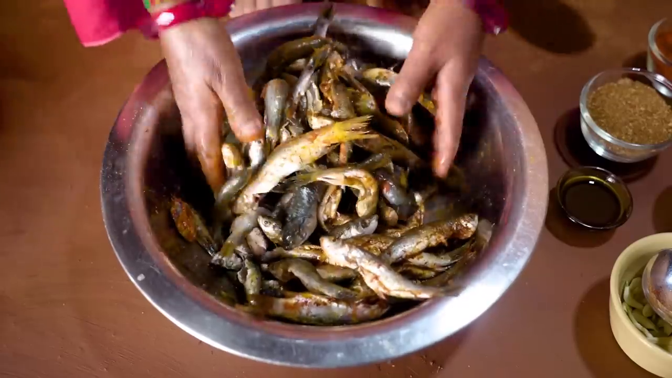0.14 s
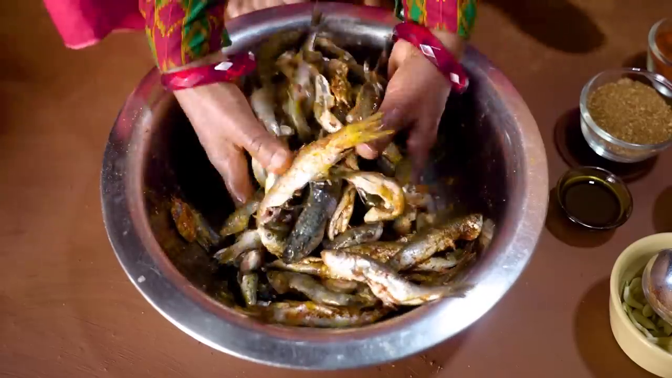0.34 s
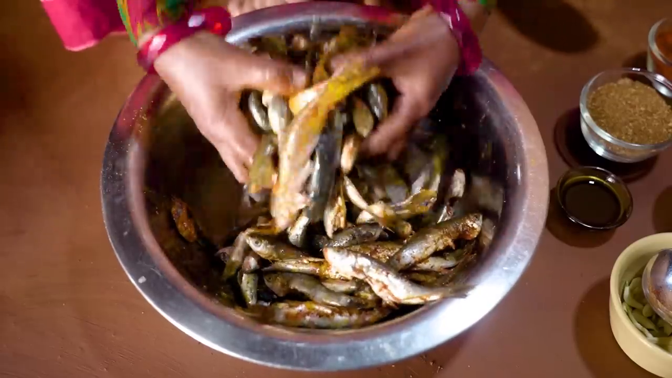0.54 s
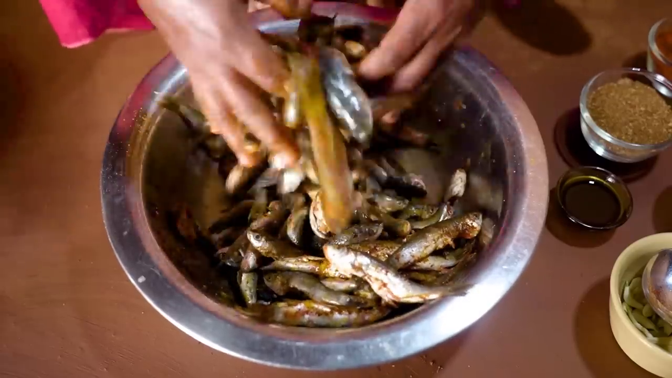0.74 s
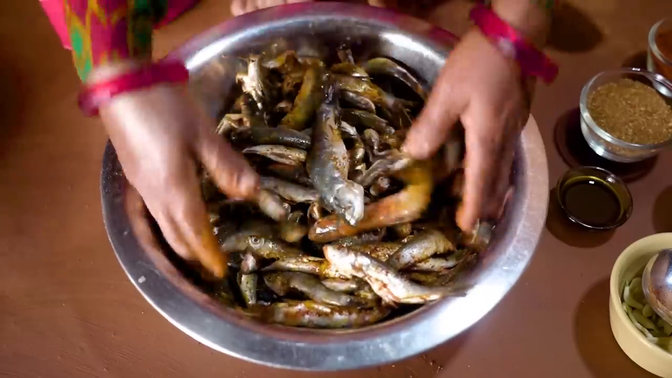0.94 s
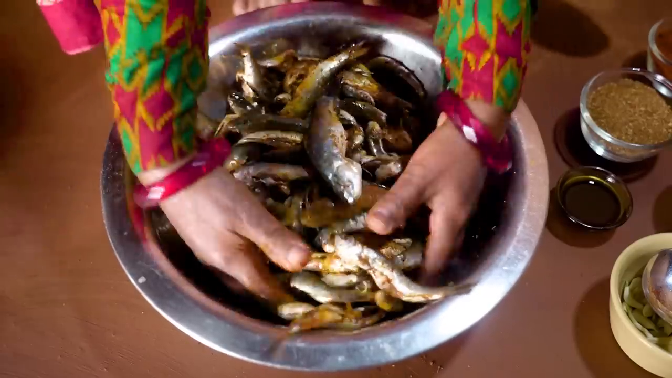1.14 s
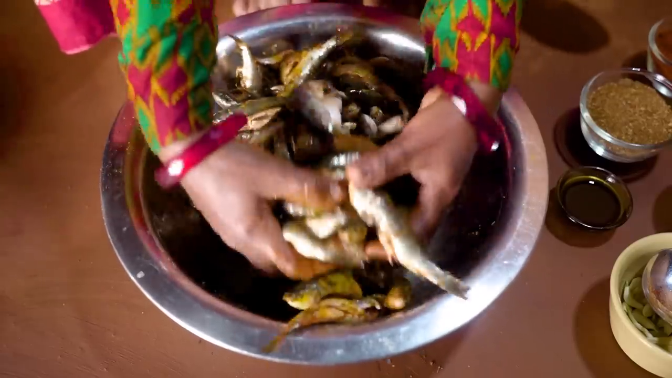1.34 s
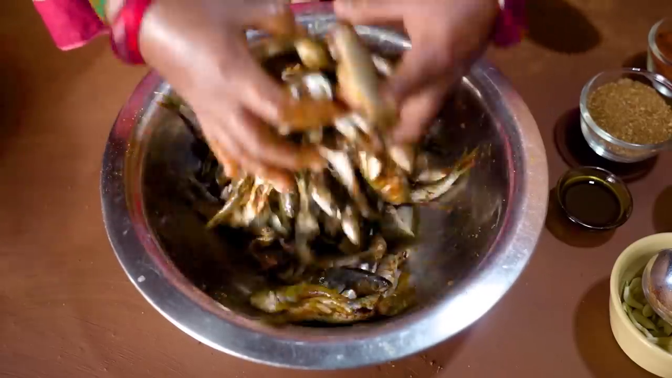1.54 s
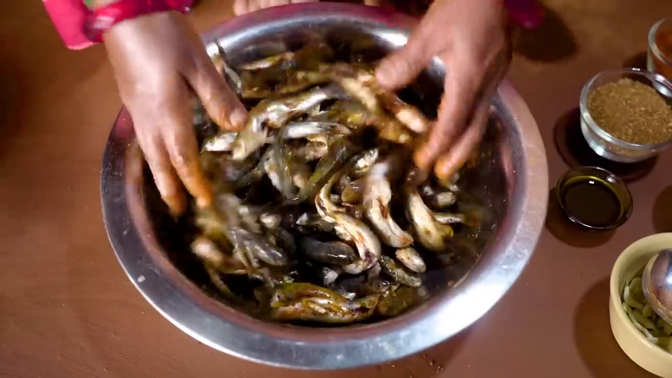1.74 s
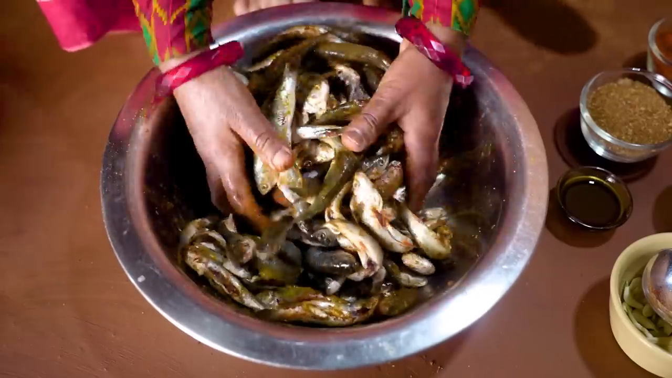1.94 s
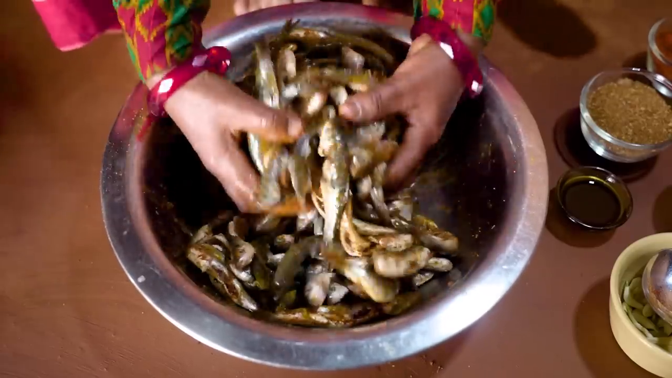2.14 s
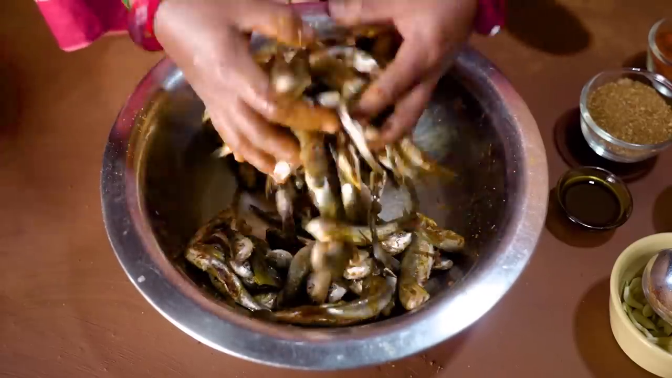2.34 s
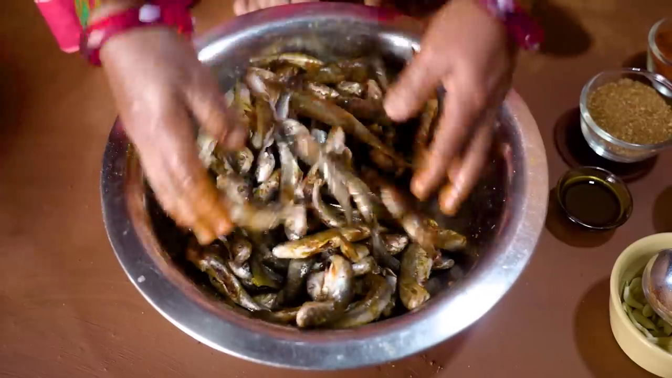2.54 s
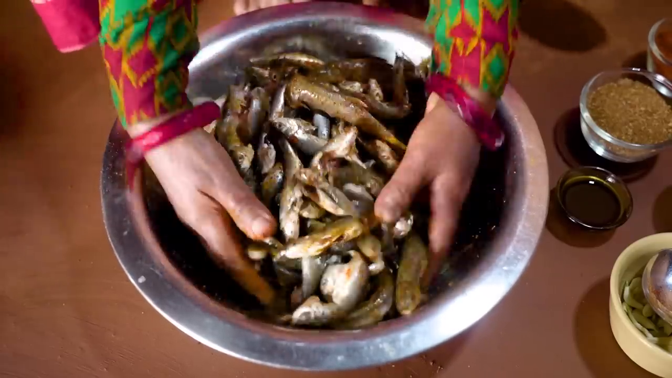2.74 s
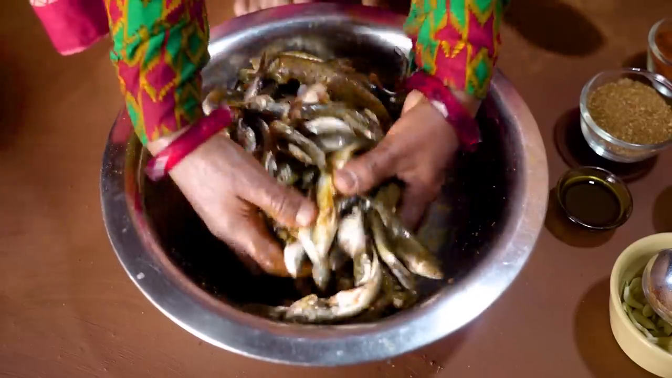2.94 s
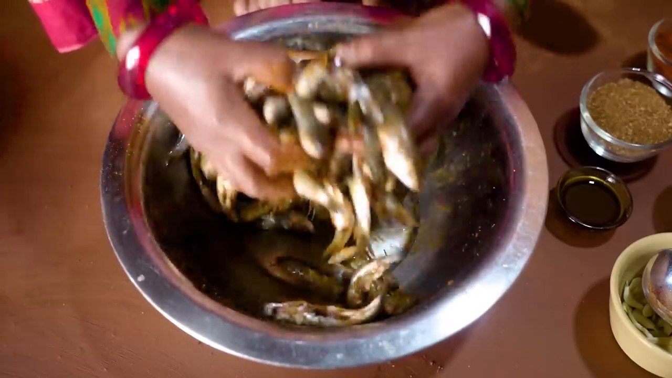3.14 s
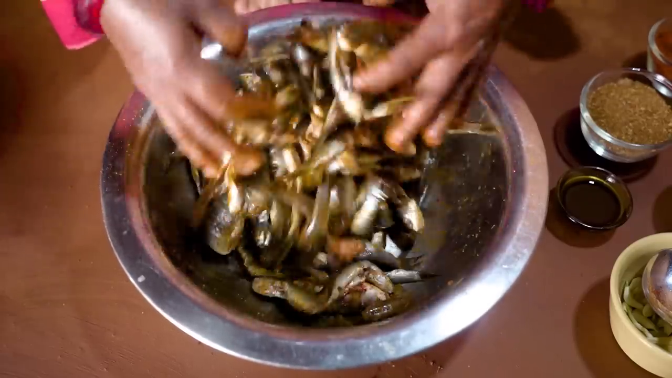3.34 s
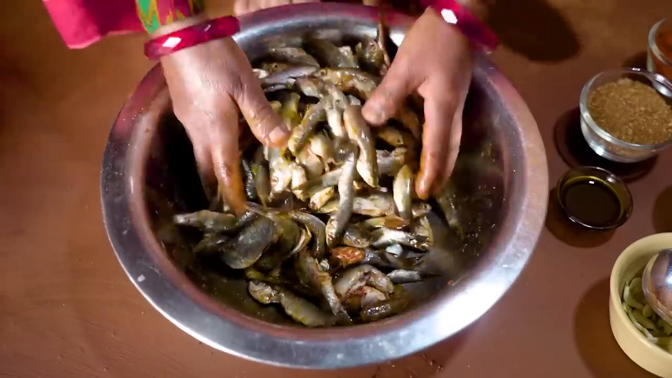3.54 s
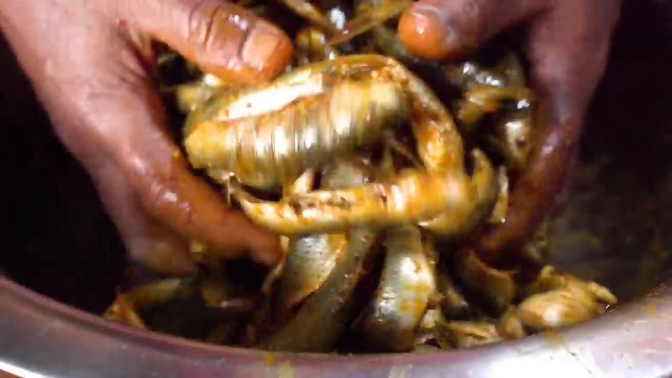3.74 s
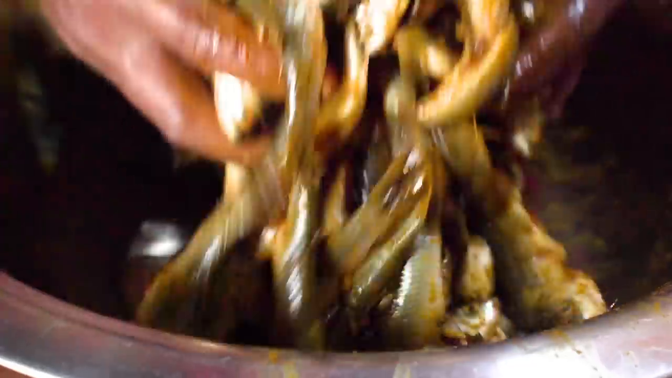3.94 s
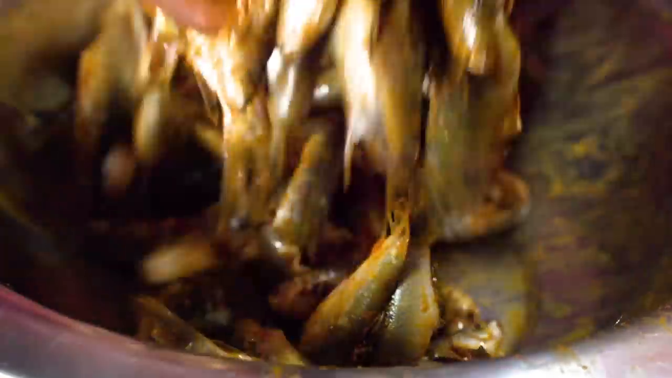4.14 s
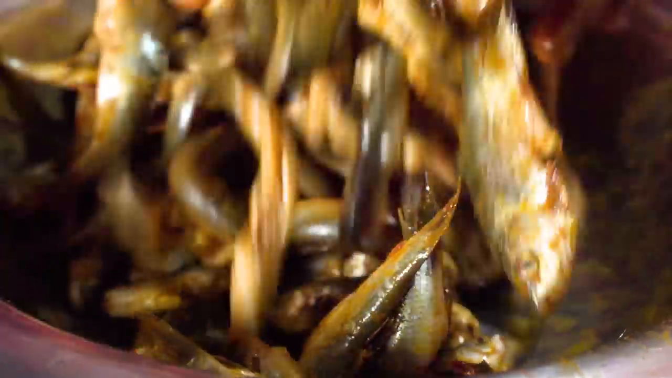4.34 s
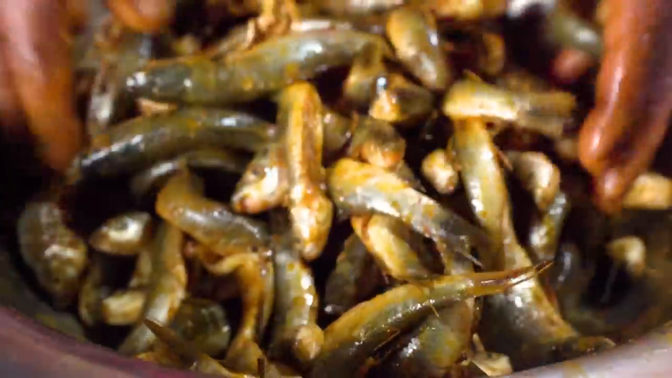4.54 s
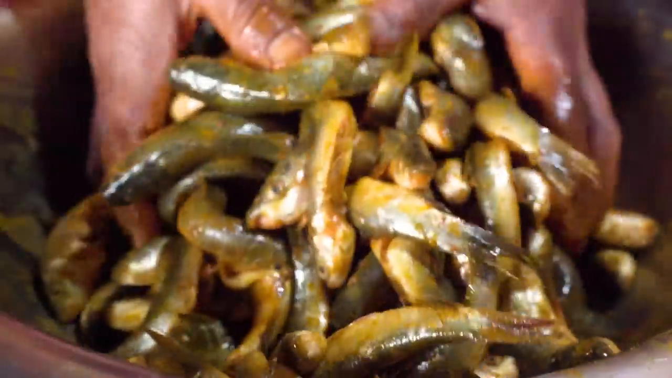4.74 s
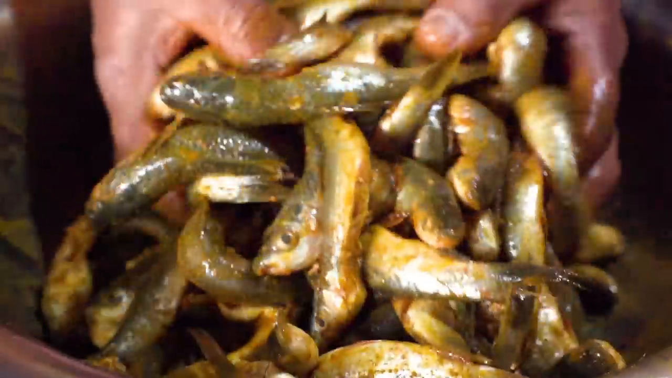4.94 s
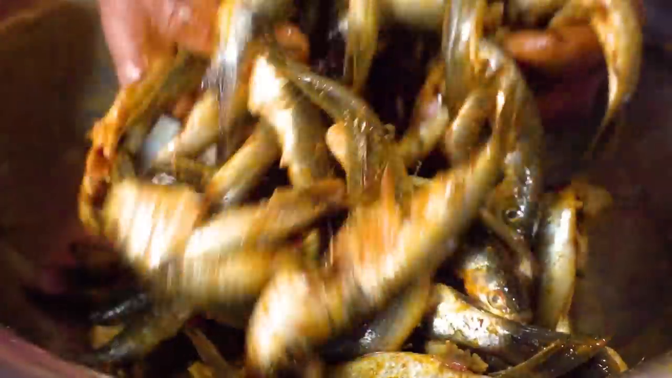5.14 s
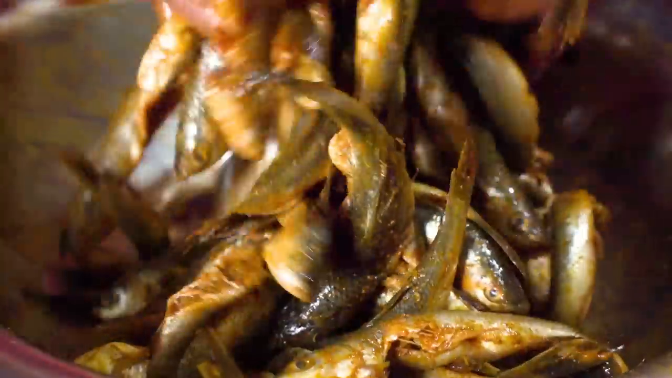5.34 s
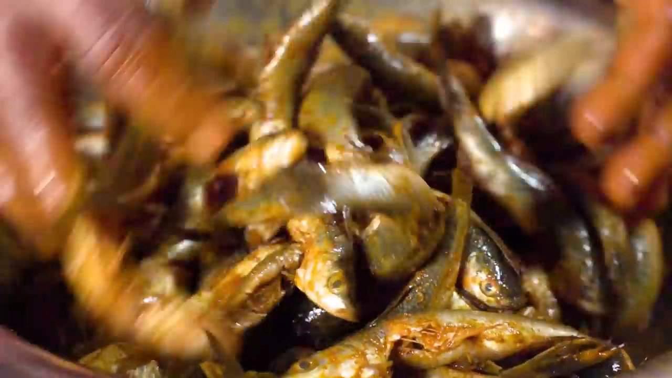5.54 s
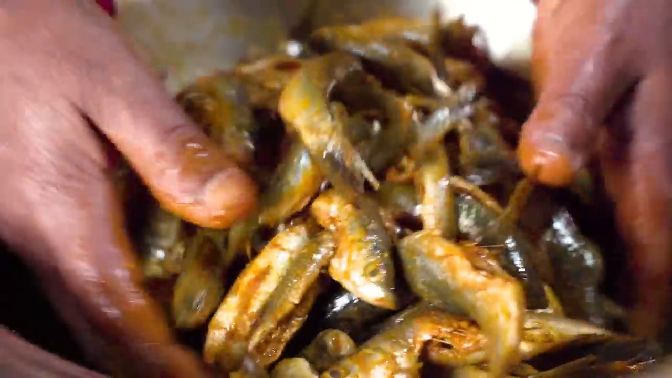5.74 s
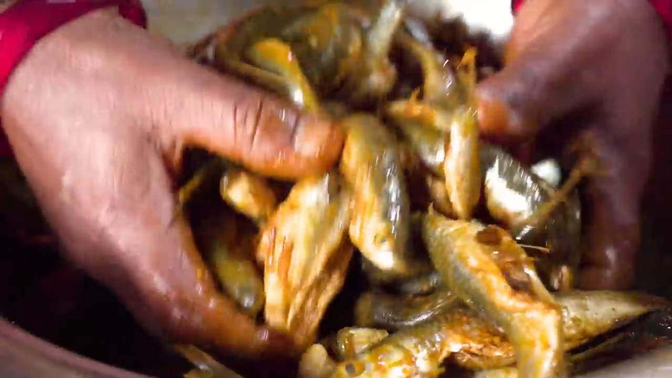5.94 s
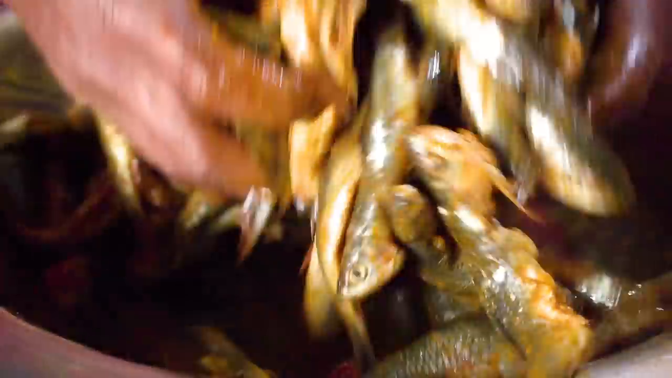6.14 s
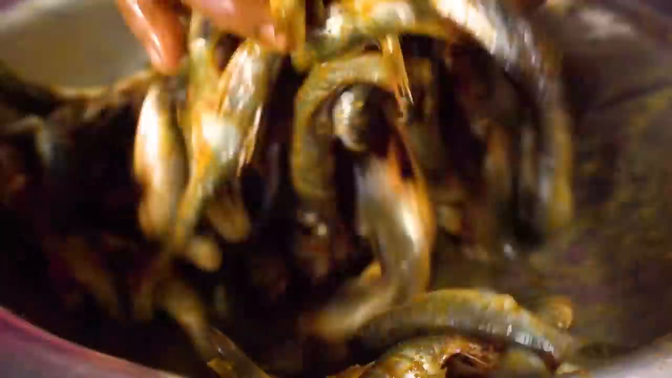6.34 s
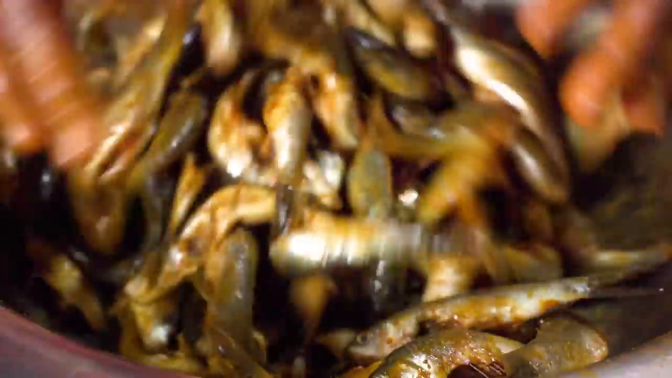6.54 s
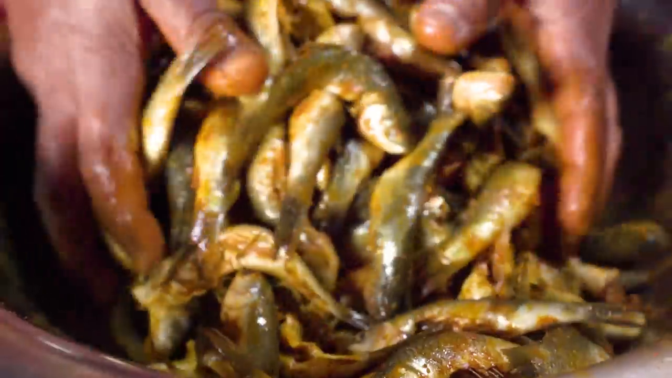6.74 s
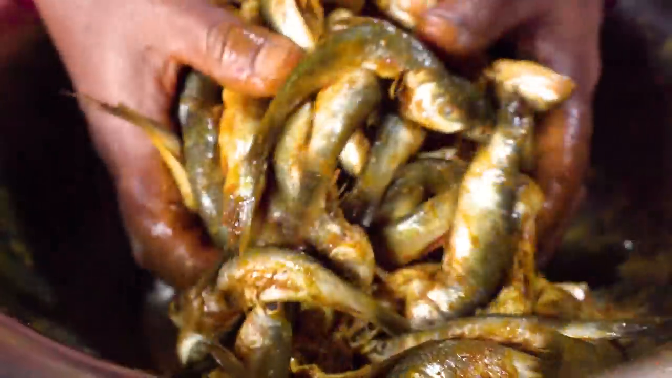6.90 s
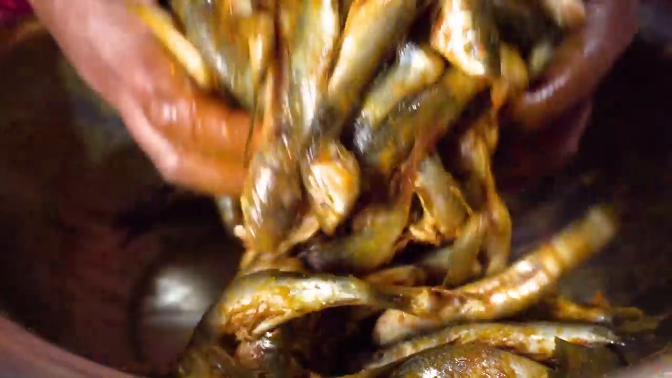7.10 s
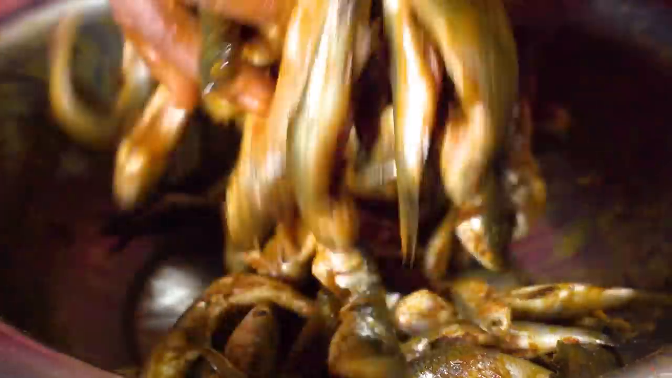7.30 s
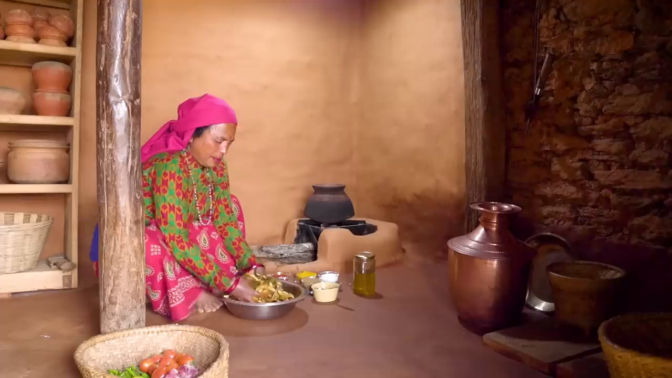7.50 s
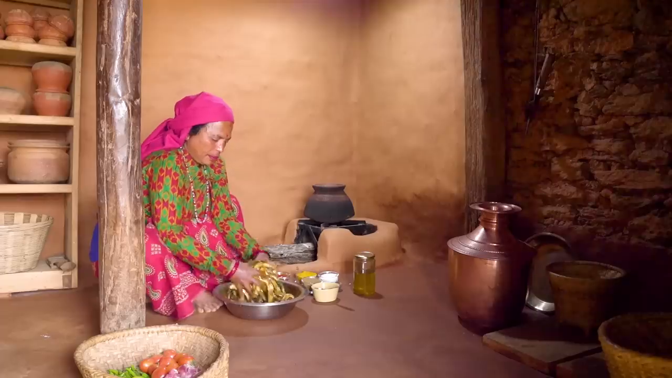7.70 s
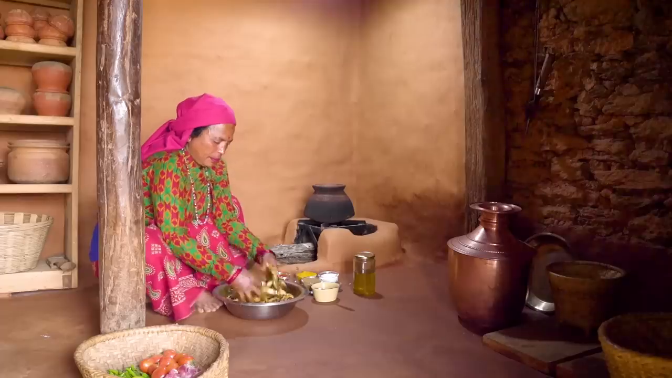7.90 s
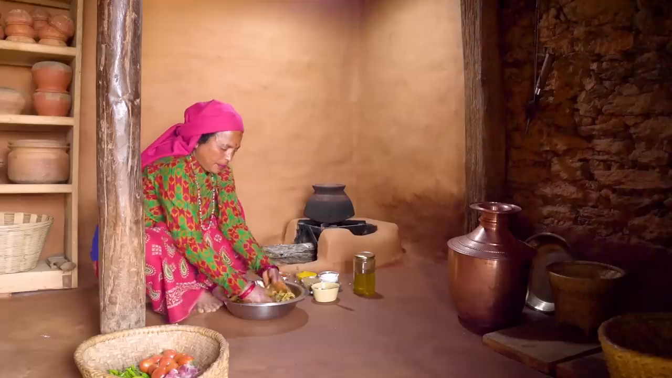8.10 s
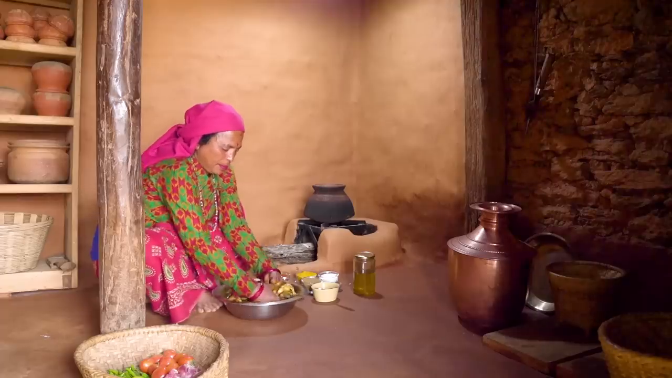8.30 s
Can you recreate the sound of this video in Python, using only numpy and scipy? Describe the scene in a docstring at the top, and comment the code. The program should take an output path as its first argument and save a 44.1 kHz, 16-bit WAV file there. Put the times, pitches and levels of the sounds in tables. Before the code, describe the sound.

Close to a steel bowl in a small quiet earthen kitchen, hands repeatedly push into and lift wet small fish. Each stroke gives a grainy sucking squelch with a fine fizz and soft slaps. A bangle knocks the rim sharply near the start, then metallic knocks become more frequent in the second half. After a last cluster of knocks the handling nearly stops, then resumes with faint squishes.

```python
"""A wet squelch, soft wet bursts, then a knock that rings briefly: two hands turn small wet fish with
spices in a steel bowl, in a small earthen kitchen. Squelches are random grains in resonances, led by
hand strokes; wet bursts, mostly slaps, are noise with a ringing air pocket; bangle knocks and clinks are a
noise crack plus decaying bowl modes; drops hum in the bowl's bottom. Lone snaps and a still room lie beneath."""
import sys
import numpy as np
from scipy import signal
from scipy.fft import rfft, irfft, next_fast_len
from scipy.io import wavfile

SR = 44100
rng = np.random.default_rng(int(sys.argv[2]) if len(sys.argv) > 2 else 0)


def wav_out(sig):
    """Save sig, one row per channel (or a flat mono array), as 16-bit PCM at SR to the path in sys.argv[1]."""
    wavfile.write(sys.argv[1], SR, np.round(np.clip(np.atleast_2d(sig).T, -1, 1) * 32767).astype(np.int16))


N = 368676

# bangle hits the rim squarely:
# (time [s], level [dB], brightness [dB/octave], leading note [Hz], ring length [factor])
KNOCKS = [(0.324, -23.5, -1.2, 2830, 0.36), (2.048, -35.5, -2, 2750, 0.55), (4.22, -30, -1.5, 1440, 0.78),
          (4.818, -26, 0.64, 2695, 0.38), (5.781, -29.5, -0.04, 1384, 0.32),
          (6.338, -41.5, -2.5, 878, 0.86), (6.868, -27, 1.5, 2823, 0.33), (6.872, -26.5, -1, 2740, 0.3),
          (6.981, -38, -6, 1436, 0.21), (7.348, -61, 3.5, 1360, 1.1), (7.409, -35.5, -7.5, 1414, 0.41),
          (7.417, -38.5, -2, 2798, 0.57)]
# bangle grazes the steel:
# (time [s], relative level [dB], brightness [dB/octave], leading note [Hz], ring length [factor])
CLINKS = [(0.815, -55.5, 0.5, 3370, 0.78), (1.01, -49, -3.5, 5150, 1.3), (1.046, -48, -0.36, 6070, 0.7),
          (1.78, -53, -2, 5530, 1.1), (1.801, -54.5, 3, 5400, 0.5), (4.029, -55.5, -4.5, 2080, 1.2),
          (5.28, -71, 0, 5700, 0.31), (5.666, -48.5, -3.5, 5080, 0.37), (5.712, -63, 0.5, 4630, 0.3)]
# soft wet noise bursts: mostly slaps, also a tick, a knock's dull body and a long wet rustle:
# (time [s], level [dB], wetness [dB], air pocket [Hz], splash t60 [s])
WET_BURSTS = [(0.147, -43, -2.5, 2030, 0.014), (0.292, -38, 0.5, 2080, 0.015),
              (0.553, -33.5, -1.5, 1230, 0.035), (0.925, -50, 1, 2800, 0.016),
              (1.309, -45.5, 6.5, 1660, 0.11), (1.634, -57, 1, 1170, 0.047), (1.896, -42.5, -1, 1090, 0.13),
              (2.048, -40, -12, 1700, 0.078), (2.399, -49.5, -20, 2030, 0.027),
              (2.469, -38, -12, 1250, 0.08), (2.596, -52.5, 3, 2340, 0.004), (2.647, -46, 10.5, 5100, 0.36),
              (2.967, -54, 3, 1150, 0.052), (3.171, -41.5, -0.5, 1860, 0.012),
              (3.257, -32, -11.5, 1500, 0.012), (3.297, -42.5, -24, 2100, 0.032),
              (3.341, -45.5, -13, 920, 0.018), (3.947, -51, -11, 1390, 0.0042),
              (4.015, -47.5, -7, 1820, 0.0047), (4.329, -48.5, -3, 1450, 0.0095),
              (4.346, -49, 5, 1390, 0.032), (4.388, -49, -4, 2030, 0.024), (4.444, -48, 1, 1970, 0.0037),
              (4.523, -53, 9, 2780, 0.021), (5.074, -55, -8, 1720, 0.046),
              (5.426, -42.5, -11, 1490, 0.0079), (5.468, -54.5, 10, 2510, 0.0055),
              (5.515, -55, -4, 890, 0.017), (6.239, -48.5, -8, 1360, 0.16), (6.384, -38.5, -3, 1200, 0.026),
              (6.416, -45.5, 2, 2550, 0.0099), (6.552, -42.5, 2, 1930, 0.0033),
              (6.586, -44.5, -1, 3320, 0.065), (6.627, -37, 1, 1090, 0.01),
              (7.019, -48.5, -19, 1220, 0.019), (7.388, -59, 2, 2200, 0.026), (7.66, -63, 5, 920, 0.032),
              (8.023, -54.5, -12, 890, 0.11)]
# fish drops on bare steel while the pile is lifted: (time [s], relative level [dB])
DROPS = [(0.555, -56.5), (2.47, -57.5), (4.014, -53.5), (4.328, -66), (4.583, -57.5), (5.515, -61.5),
         (6.384, -60.5), (6.627, -44)]
# hands push into the pile, lift or lightly rustle it: (start [s], closing [s], easing [s],
# relative sliding [dB], relative squeezing [dB], air pockets at the firmest grip [Hz])
STROKES = [(0.0, 0.0035, 0.014, -50, -43.5, 2750), (0.132, 0.2, 0.14, -47.5, -36.5, 2200),
           (0.48, 0.033, 0.4, -57, -52.5, 2760), (0.688, 0.01, 0.23, -51, -46, 2940),
           (1.004, 0.18, 0.21, -47.5, -40, 2510), (1.44, 0.099, 0.35, -62.5, -54, 2637),
           (1.79, 0.2, 0.18, -44.5, -39.5, 2480), (2.219, 0.1, 0.04, -53.5, -48, 2270),
           (2.323, 0.017, 0.036, -45, -54, 2840), (2.45, 0.089, 0.032, -52, -46.5, 1120),
           (2.665, 0.12, 0.15, -43.5, -36.5, 2050), (3.26, 0.079, 0.043, -57.5, -46.5, 1150),
           (3.44, 0.09, 0.025, -55, -51, 1510), (3.543, 0.12, 0.13, -44.5, -40, 2530),
           (3.88, 0.19, 0.17, -68, -58, 1700), (4.443, 0.03, 0.15, -51.5, -53.5, 1800),
           (4.668, 0.11, 0.26, -51.5, -43, 1900), (5.427, 0.054, 0.075, -48, -58.5, 1420),
           (5.68, 0.13, 0.17, -50, -41.5, 1713), (6.34, 0.015, 0.29, -55, -47, 1200),
           (6.56, 0.071, 0.32, -52.5, -52, 2800), (6.738, 0.14, 0.2, -49, -40.5, 1760),
           (7.36, 0.087, 0.082, -58.5, -46.5, 1430), (7.958, 0.084, 0.078, -54, -78, 1230),
           (8.131, 0.063, 0.11, -57.5, -49, 2270), (8.279, 0.053, 0.06, -65, -47.5, 2030)]
# modes of the loaded bowl with a bangle against it: (nominal frequency [Hz], relative level [dB], nominal t60 [s])
BOWL_MODES = [(299.8, -11.5, 0.57), (455, -19, 0.083), (522, 2.5, 0.17), (625.5, 9, 0.24),
              (691, -29.5, 0.11), (877, -0.5, 0.43), (1030, -18.5, .11), (970, -12.5, 0.16),
              (1100, -21, 0.077), (1291, 1, 0.37), (1389, -18.5, 0.22), (1384, 2.5, 0.15),
              (1430, -13.5, 0.82), (1654, 4.5, 0.083), (1818, 1.5, 0.14), (2080, -5.5, 0.24),
              (2660, 3, 0.29), (2760, 8, 0.12), (2844, -4, 0.4), (2970, -18, 0.046), (3400, -44, 0.18),
              (3553, 13, 0.039), (4800, 11.5, 0.05), (4600, -16.5, 0.12), (4950, -31, 0.13),
              (5370, -32, 0.085), (5900, 9, 0.043), (6100, -16.5, 0.024), (5700, -32, 0.24)]
# modes of the free bottom of the bowl: (frequency [Hz], relative level [dB], t60 [s])
BOTTOM_MODES = [(294, -4, 0.22), (478, 4.5, 0.21), (610, -3, 0.22), (890, -4, 0.25), (1370, 1, 0.37),
                (1380, -12, 0.27), (2030, -11.5, 0.99)]
# spectra of a knock's first crack, a wet burst, wet rubbing, the still room:
# (frequency [Hz], relative level [dB per Hz])
CRACK_SPECTRUM = [(110, -39), (230, -58.5), (480, 9), (780, 2), (1350, -3), (2200, -38), (2780, 6.5),
                  (3900, -18.5), (5500, 6), (6600, -13), (10000, -24.5), (16000, -35)]
WET_BURST_SPECTRUM = [(35, -27), (60, -79), (503, 1), (785, 1.5), (1220, -7), (1660, -12.5), (2900, -7),
                      (3850, -9.5), (5720, -1), (6740, -13), (10000, -14.5), (16000, -33)]
RUB_SPECTRUM = [(290, -7), (350, -26.5), (470, -24.5), (595, 10.5), (720, -13.5), (850, 5.5), (1240, -10.5),
                (1550, -11), (2200, -8), (2780, -6.5), (4000, -0.5), (5800, -5.5), (7200, -7.5),
                (16000, -19.5)]
ROOM_SPECTRUM = [(18, -63.5), (30, -42.5), (295, -9.5), (415, -13.5), (540, 3.5), (801, -9), (2900, -1.5),
                 (3310, -6), (8980, -9), (16000, -11)]
# stereo tilt: (frequency [Hz], left minus right [dB])
LEFT_TILT = [(200, -1.5), (700, 1.5), (2400, 0), (4400, 4), (8100, -1.2), (15000, -1.5)]
# lag of the left side: (frequency [Hz], phase [rad])
LEFT_LAG = [(60, 0.018), (450, 0.45), (1500, 0.69), (3500, 1), (5800, 0.76), (16000, 1)]
# diffuse stereo noise: (frequency [Hz], likeness of left and right [0-1])
LIKENESS = [(250, 0.91), (1200, 0.4), (3000, 0.36), (8000, 0.063)]
# bounds of belly, low ring, high ring, clink, tick: (edge [Hz])
REGISTER_EDGES_HZ = [250, 900, 2000, 4000, 7000, 16000]
# balance of these registers for a square hit and a graze: (relative level [dB])
KNOCK_BALANCE_DB = [-13.5, -0.96, -2, -7.5, -17]
CLINK_BALANCE_DB = [-3.5, -1, 5.5, 11, 5.5]

STILL_ROOM_DB, ROOM_T60_S, CUTOFF_HZ = -65.5, 0.18, 16200
HIT_SAMPLES = SR // 3
LEAD_REGISTER_DB = 2  # extra for the register that holds the leading note
HARDNESS_KNEE_HZ = 1320  # brightness acts above this pitch
ATTACK_DB_PER_S, RELEASE_DB_PER_S = 699, 178
SLIDE_SWELL_DB, SLIDE_SAG_DB = -0.5, 12
SQUEEZE_SWELL_DB, SQUEEZE_SAG_DB = 13, 10
POCKET_FALL_OCTAVES_PER_S, POCKET_WANDER_OCTAVES = 1.8, 0.18
IDLE_SLIDE_DB, IDLE_SQUEEZE_DB = -69, -64  # the pile never lies quite still
PAUSE_START_S, PAUSE_END_S, PAUSE_DB, PAUSE_FADE_S = 7.6, 7.9, -11.5, 0.039


def from_db(db):
    """Decibels to gain."""
    return 10 ** (np.asarray(db) / 20)


def rms_one(x):
    """Scales to rms 1."""
    return x / np.sqrt(np.mean(x ** 2) + 1e-20)


def at_hz(points, hz):
    """Reads a table on a log-frequency axis."""
    known_hz, values = np.transpose(points)
    return np.interp(np.log(np.maximum(hz, 1)), np.log(known_hz), values)


def bins_hz(size):
    """Bin frequencies for a block of this many samples."""
    return np.arange(size // 2 + 1) * SR / size


def dying(t, t60):
    """Exponential decay, 60 dB in t60 seconds."""
    return np.exp(-np.log(1000) * t / t60)


def drift(knots_per_s):
    """Random normal knots joined by lines."""
    knots = rng.standard_normal(N // 40)
    return np.interp(np.arange(N) * knots_per_s / SR, np.arange(len(knots)), knots)


def coloured(x, points):
    """Minimum-phase filter that follows (frequency [Hz], gain [dB]), built by folding the cepstrum."""
    size = 4096
    cepstrum = irfft(np.log(from_db(at_hz(points, bins_hz(size)))))
    cepstrum[1:size // 2] *= 2
    cepstrum[size // 2 + 1:] = 0
    response = np.array(irfft(np.exp(rfft(cepstrum))), ndmin=x.ndim)
    return signal.oaconvolve(x, response, axes=-1)[..., :x.shape[-1]]


def resonance(x, hz, width_hz):
    """Two-pole resonance, gain about 1 at its peak."""
    radius = np.exp(-np.pi * width_hz / SR)
    zeros = np.array([1, 0, -1]) * (1 - radius * radius) / 2
    poles = [1, -2 * radius * np.cos(2 * np.pi * hz / SR), radius * radius]
    return signal.lfilter(zeros, poles, x + 1e-18)


def diffuse(size):
    """Stereo noise, alike in the bass and nearly unrelated in the treble."""
    mid, side = rfft(rng.standard_normal((2, size)))
    alike = np.clip(at_hz(LIKENESS, bins_hz(size)), 0, 1)
    spectrum = np.sqrt(1 + alike) * mid + np.sqrt(1 - alike) * side * [[1], [-1]]
    return rms_one(irfft(spectrum, size))


def kitchen(x, early_db, tail_db, early_t60=0.07):
    """Direct sound, quick reflections from bowl and floor, room tail, then stereo tilt and lag."""
    t, n = np.arange(HIT_SAMPLES) / SR, np.shape(x)[-1]
    early = diffuse(HIT_SAMPLES) * dying(t, early_t60) * (t > .001)
    tail = diffuse(HIT_SAMPLES) * dying(t, ROOM_T60_S) * (t > .008)
    echo = from_db(early_db) * rms_one(early) + from_db(tail_db) * rms_one(tail)
    echo = echo / np.sqrt(HIT_SAMPLES)
    size = 2 * next_fast_len((n + HIT_SAMPLES) // 2)
    hz, sides = bins_hz(size), np.array([[.5], [-.5]])
    stereo = from_db(sides * at_hz(LEFT_TILT, hz)) * np.exp(-1j * sides * at_hz(LEFT_LAG, hz))
    return irfft(rfft(x, size) * (1 + rfft(echo, size)) * stereo)[:, :n]


def voiced(hit, edges_hz, levels_db):
    """Place and force of a blow set the balance of its registers, gauged over the first 30 ms."""
    size = round(.03 * SR)
    power = 2 * abs(rfft(hit.mean(axis=0)[:size], 4 * size)) ** 2 / (4 * size * size)
    hz, points = bins_hz(4 * size), []
    for low_hz, high_hz, db in zip(edges_hz, edges_hz[1:], levels_db):
        gain_db = db - 10 * np.log10(power[(hz >= low_hz) & (hz < high_hz)].sum())
        points += [(low_hz * 1.25, gain_db), (high_hz / 1.25, gain_db)]
    # the bowl radiates little below its lowest mode
    bass_db = points[0][1]
    return coloured(hit, [(90, bass_db - 12.5), (190, bass_db - 18), (275, bass_db)] + points)


def add(out, s, hit):
    """Mixes a hit in at time s."""
    start = max(round(s * SR), 0)
    out[:, start:start + hit.shape[1]] += hit[:, :N - start]


def activity_db(t):
    """0 dB while the hands work, lower in their pause."""
    into_pause = np.minimum(t - PAUSE_START_S, PAUSE_END_S - t) / PAUSE_FADE_S + 1
    return PAUSE_DB * np.clip(into_pause, 0, 1)


def grains(low_hz, high_hz, per_s, spread_db, q, favour=lambda hz: 1, count=10, max_lag_s=.00008):
    """Tiny films of slime burst at random in a bank of resonances, each with its own stereo lag; rms 1."""
    out = np.zeros((2, N))
    size, place = rng.random((2, N))
    for hz in np.geomspace(low_hz, high_hz, count):
        at = np.flatnonzero(rng.random(N) < per_s / count / SR)
        sizes = from_db(spread_db * np.minimum(-np.log(size[at]), 4)) * (-1) ** at
        lag = np.round((2 * place[at] - 1) * max_lag_s * SR).astype(int)
        clicks = np.zeros((2, N))
        clicks[0, at] = sizes
        clicks[1, np.clip(at + lag, 0, N - 1)] = sizes
        # sqrt(hz) turns dB per Hz into level per log-spaced band
        gain = from_db(at_hz(RUB_SPECTRUM, hz)) * np.sqrt(hz) * favour(hz)
        out += rms_one(resonance(clicks, hz, hz / q)) * gain
    return rms_one(out)


def still_room():
    """Steady diffuse noise of the quiet room."""
    return from_db(STILL_ROOM_DB) * rms_one(coloured(diffuse(N), ROOM_SPECTRUM))


def pops(level_db=-65):
    """Lone threads of slime snap throughout as the fish settle, softer in the pause."""
    snaps = grains(1065, 11000, per_s=40, spread_db=5.0, q=4.1, count=9)
    snaps = coloured(snaps, [(300, -8.0), (900, -5), (3000, -1.5), (6000, -9)])
    snaps = snaps * from_db(level_db + activity_db(np.arange(N) / SR))
    return kitchen(snaps, early_db=4.5, tail_db=-20.5)


def drops():
    """With no fish to damp it, the bottom of the bowl hums on after a soft blow."""
    out, t = np.zeros((2, N)), np.arange(HIT_SAMPLES) / SR
    hum = np.zeros(HIT_SAMPLES)
    for k, (hz, db, t60) in enumerate(BOTTOM_MODES):
        hum += from_db(db) * np.sin(2 * np.pi * hz * t) * dying(t, t60) * (-1) ** k
    # a soft contact starts the modes gently
    hum = kitchen(hum * (1 - dying(t, 0.03)), early_db=-10.5, tail_db=-12)
    for s, db in DROPS:
        add(out, s, from_db(db) * hum)
    return out


def wet_bursts(pocket_db=12, pocket_q=6):
    """Soft wet noise, mostly slaps, decays while a resonance rings like a bursting air pocket."""
    out, t = np.zeros((2, N)), np.arange(HIT_SAMPLES) / SR
    edges_hz = [250, 1100, 3800, 16000]  # thud, smack, spray
    balance_db = np.array([-10, -1.5, -10])
    db_per_wetness = np.array([-0.26, 0, 1])  # wetness trades thud for spray
    for s, db, wetness_db, pocket_hz, t60 in WET_BURSTS:
        splash = coloured(rng.standard_normal(HIT_SAMPLES) * dying(t, t60), WET_BURST_SPECTRUM)
        pocket = from_db(pocket_db) * resonance(splash, pocket_hz, pocket_hz / pocket_q)
        hit = kitchen(splash + pocket, early_db=0, tail_db=-5)
        registers_db = balance_db + wetness_db * db_per_wetness
        add(out, s, from_db(db) * voiced(hit, edges_hz, registers_db))
    return out


def strikes(blows, balance_db, level_db, crack_db, crack_t60, lead_db=3, lead_cycles=330, near_db=4,
            vary_db=3.0, detune=0.0011):
    """A hard crack, then the bowl's modes; each spot on the rim favours those near its leading note."""
    out, t = np.zeros((2, N)), np.arange(HIT_SAMPLES) / SR
    edges_hz = np.array(REGISTER_EDGES_HZ)
    centres_hz = np.sqrt(edges_hz[1:] * edges_hz[:-1])
    octaves_up = np.maximum(np.log2(centres_hz / HARDNESS_KNEE_HZ), 0)
    for s, db, brightness, lead_hz, length in blows:
        modes = BOWL_MODES + [(lead_hz, lead_db, lead_cycles / lead_hz)]
        hz, mode_db, t60 = np.transpose(modes)[:, :, None]
        strength, shift, sign = rng.standard_normal((3, len(hz), 1))
        favour_db = near_db * np.exp(-(np.log2(hz / lead_hz) / 0.14) ** 2)
        amplitude = np.sign(sign) * from_db(mode_db + favour_db + vary_db * strength)
        tones = amplitude * np.sin(2 * np.pi * hz * (1 + detune * shift) * t)
        ring = rms_one((tones * dying(t, t60 * max(length, .2))).sum(axis=0))
        burst = rng.standard_normal(HIT_SAMPLES) * dying(t, crack_t60)
        crack = rms_one(coloured(burst, CRACK_SPECTRUM))
        hit = kitchen(ring + from_db(crack_db) * crack, early_db=-2, tail_db=-3.0)
        holds_lead = np.diff(edges_hz > lead_hz)
        registers_db = np.array(balance_db) + brightness * octaves_up + LEAD_REGISTER_DB * holds_lead
        add(out, s, from_db(level_db + db) * voiced(hit, edges_hz, registers_db))
    return out


def knocks():
    """Bangles hit the rim squarely, or graze it and clink."""
    square = strikes(KNOCKS, KNOCK_BALANCE_DB, level_db=0, crack_db=-1.0, crack_t60=0.032)
    grazing = strikes(CLINKS, CLINK_BALANCE_DB, level_db=0.5, crack_db=-1, crack_t60=0.068)
    return square + grazing


def stroke_db(t, closing_s, easing_s, swell_db, sag_db):
    """Fast attack, rounded change while closing and easing, release; 0 dB at the firmest grip."""
    end = closing_s + easing_s
    arch = np.interp(t, [0, closing_s, end], [-1, 0, 1])
    grip_db = -np.where(arch < 0, swell_db, sag_db) * arch ** 2
    return grip_db + ATTACK_DB_PER_S * np.minimum(t, 0) - RELEASE_DB_PER_S * np.maximum(t - end, 0)


def hands():
    """Sliding [dB], squeezing [dB], air pocket pitch [Hz], falling through a stroke; the strongest leads."""
    t = np.arange(0, N / SR, .001)
    slide = [IDLE_SLIDE_DB + activity_db(t)]
    squeeze, pitch = [], []
    for s, closing_s, easing_s, slide_db, squeeze_db, hz in STROKES:
        slide.append(slide_db + stroke_db(t - s, closing_s, easing_s, SLIDE_SWELL_DB, SLIDE_SAG_DB))
        squeeze.append(squeeze_db + stroke_db(t - s, closing_s, easing_s, SQUEEZE_SWELL_DB, SQUEEZE_SAG_DB))
        since_grip_s = np.clip(t - s - closing_s, -closing_s, easing_s)
        pitch.append(hz * 2 ** (-POCKET_FALL_OCTAVES_PER_S * since_grip_s))
    pocket_hz = np.array(pitch)[np.argmax(squeeze, axis=0), np.arange(len(t))]
    squeeze.append(IDLE_SQUEEZE_DB + activity_db(t))
    curves = np.max(slide, axis=0), np.max(squeeze, axis=0), pocket_hz
    return [np.interp(np.arange(N) / SR, t, curve) for curve in curves]


def squelch(pile_db=-7.0, wet_db=-2, fizz_db=-2.0, clump_db=2.2, pile_lumps_db=1.66, pocket_db=8,
            pocket_octaves=0.38, tick_db=-8):
    """Hands push, lift or rustle the fish: low sucking, squeezed air pockets, a fizz of scales and spice."""
    slide_db, squeeze_db, pocket_hz = hands()
    pocket_hz = pocket_hz * 2 ** (POCKET_WANDER_OCTAVES * drift(18))

    def near_pocket(hz):
        """Gain for grains pitched near the air pockets."""
        return from_db(pocket_db * np.exp(-(np.log2(hz / pocket_hz) / pocket_octaves) ** 2))

    pile = grains(315.5, 977, per_s=1500, spread_db=3.5, q=25)
    pile = coloured(pile, [(80, -13), (300, -5.0), (1200, -2.0), (4000, -13.0)])
    wet = grains(1290, 3330, per_s=2600, spread_db=0.0, q=9.8, favour=near_pocket)
    wet = coloured(wet, [(200, -23.5), (900, 3.5), (4000, -6.5), (9000, -27.0)])
    fizz = grains(4850, 14000, per_s=14000, spread_db=0.5, q=12.0)
    fizz = coloured(fizz, [(400, -30), (3300, -1.5)])
    # now and then a larger film of slime bursts with a wet tick
    ticks = grains(850, 5850, per_s=220, spread_db=4.5, q=11, count=6)
    layers = pile * from_db(slide_db + pile_db + pile_lumps_db * drift(25))
    layers = layers + wet * from_db(squeeze_db + wet_db)
    layers = layers + fizz * from_db(slide_db + fizz_db)
    layers = layers + ticks * from_db((slide_db + squeeze_db) / 2 + tick_db)
    # skin sticks and slips, so the grains come in clumps
    layers = layers * from_db(clump_db * drift(110))
    # the two hands take turns, each with reflections of its own
    share = (1 + np.tanh(2 * drift(40))) / 2
    return sum(kitchen(layers * hand, early_db=-3.5, tail_db=-10) for hand in (share, 1 - share))


def scene():
    """The bowl and the hands over a quiet room."""
    return still_room() + pops() + drops() + wet_bursts() + knocks() + squelch()


def record(dry):
    """Steep elliptic low-pass."""
    return signal.sosfilt(signal.ellip(10, .3, 70, CUTOFF_HZ, fs=SR, output="sos"), dry)


dry = scene()
out = record(dry)
wav_out(out)
```